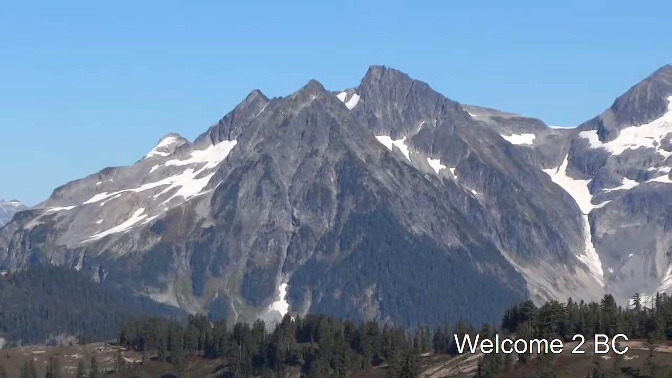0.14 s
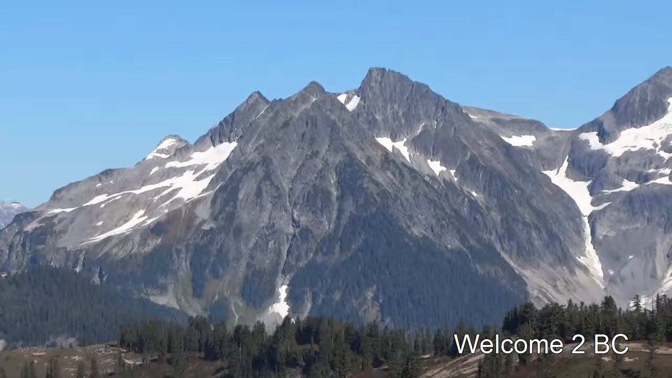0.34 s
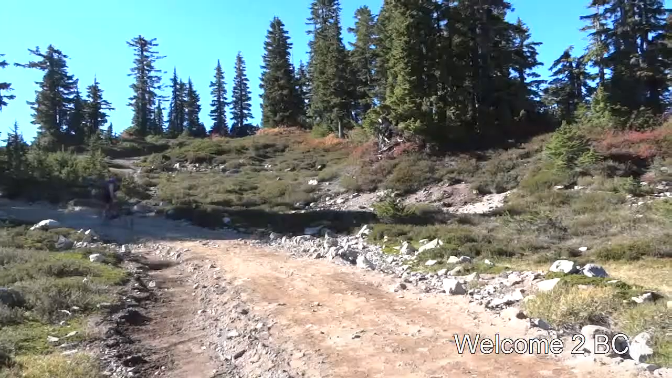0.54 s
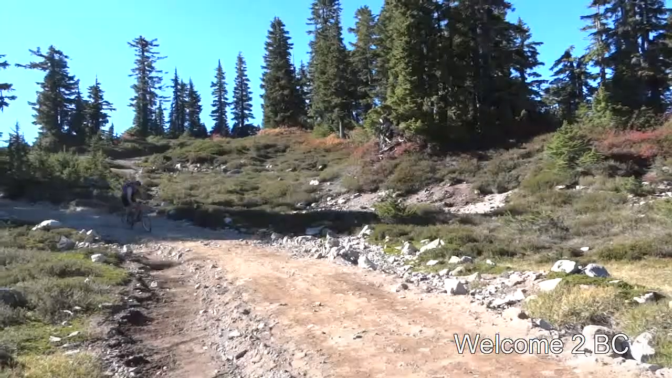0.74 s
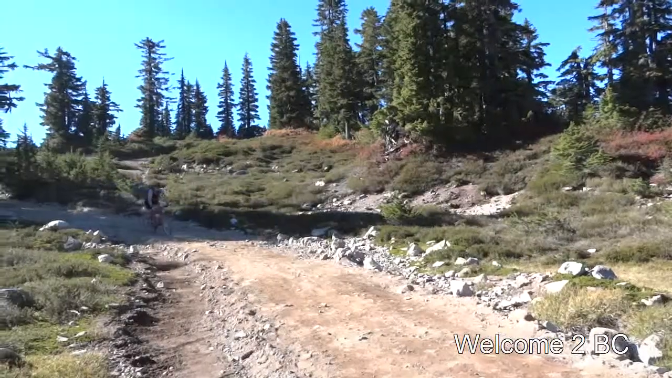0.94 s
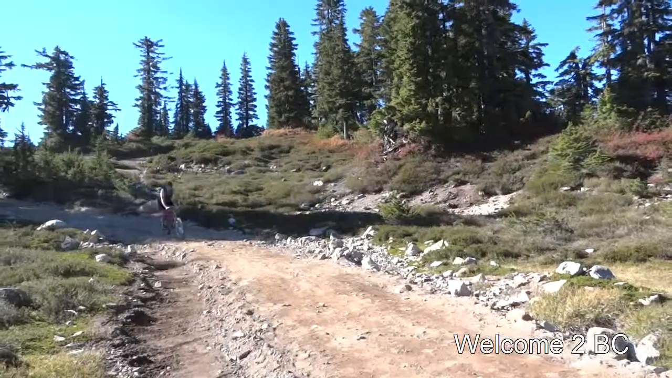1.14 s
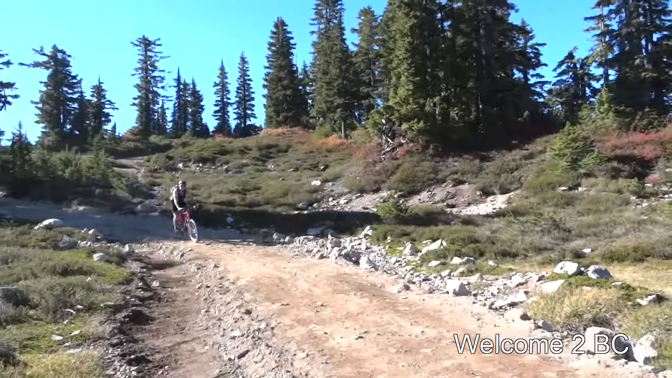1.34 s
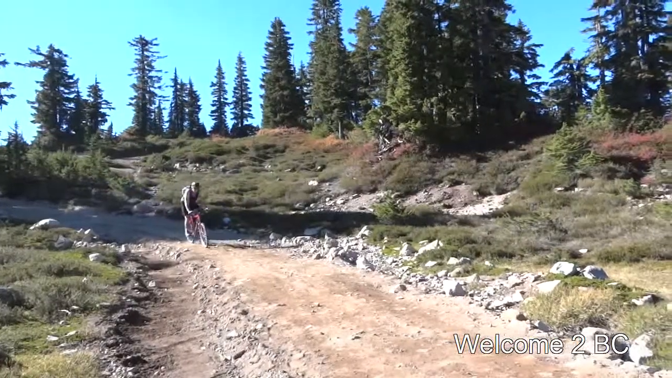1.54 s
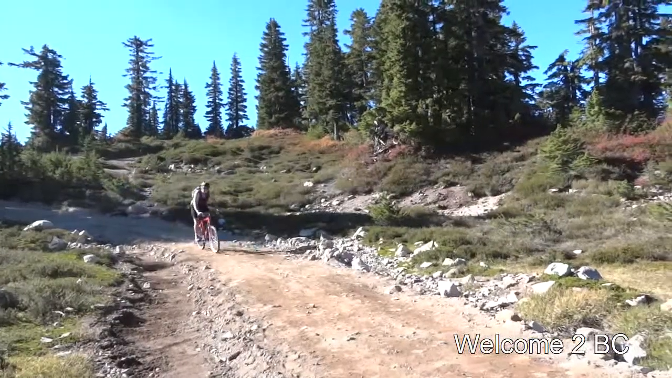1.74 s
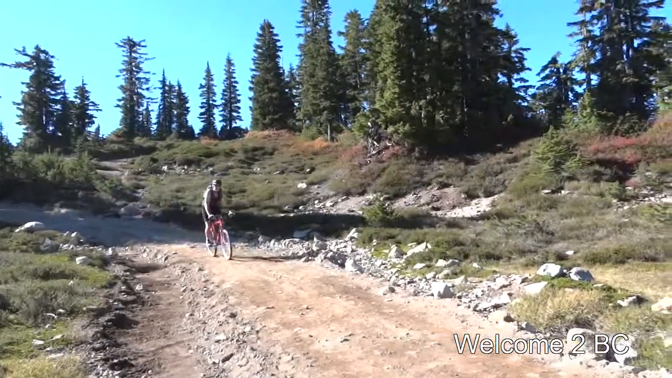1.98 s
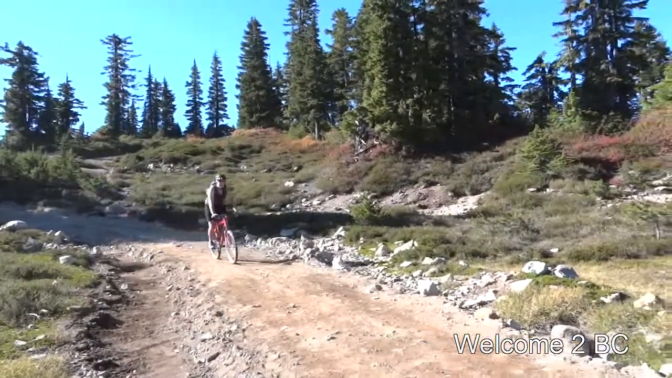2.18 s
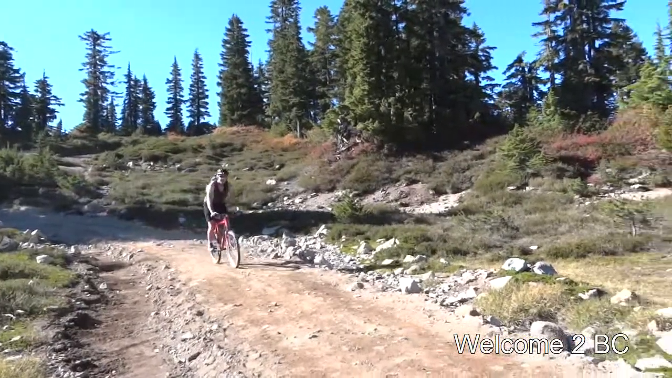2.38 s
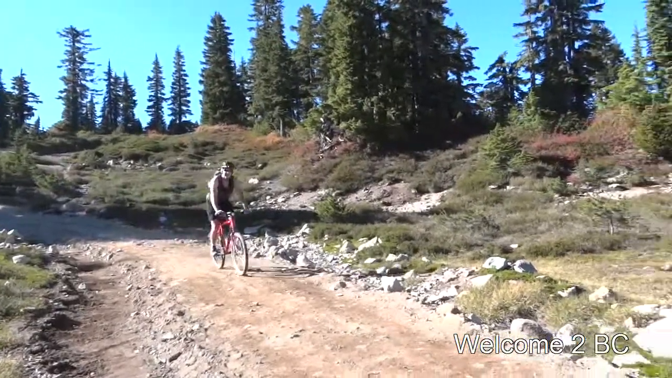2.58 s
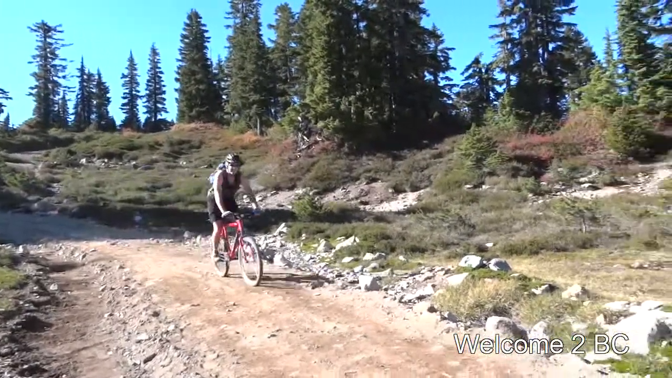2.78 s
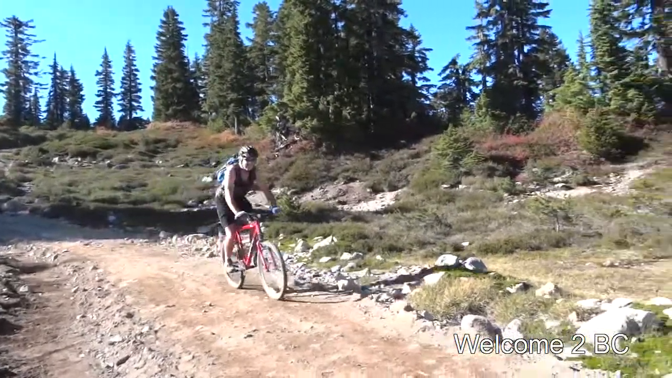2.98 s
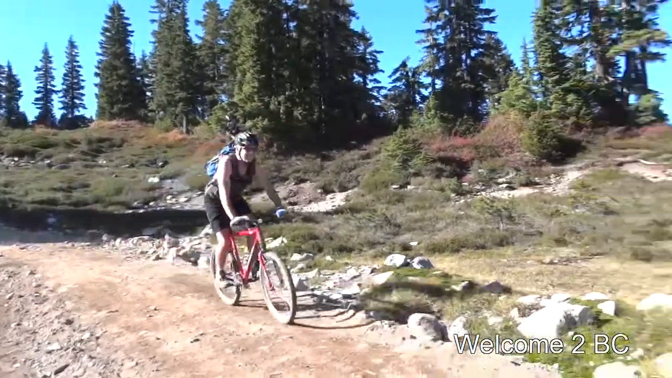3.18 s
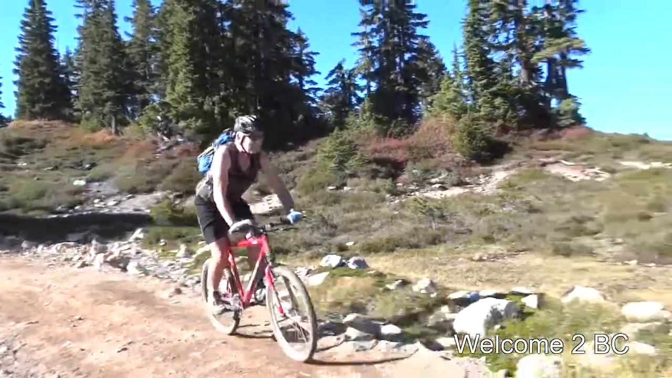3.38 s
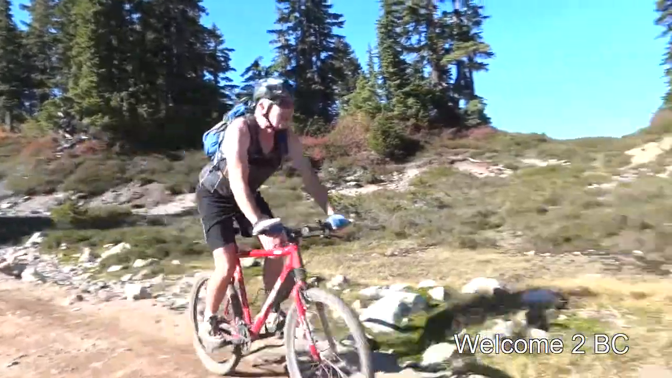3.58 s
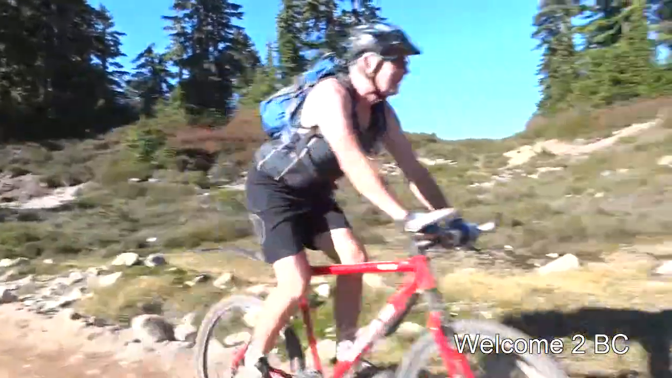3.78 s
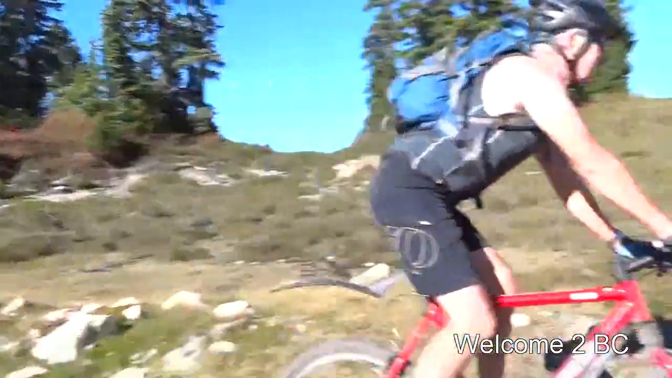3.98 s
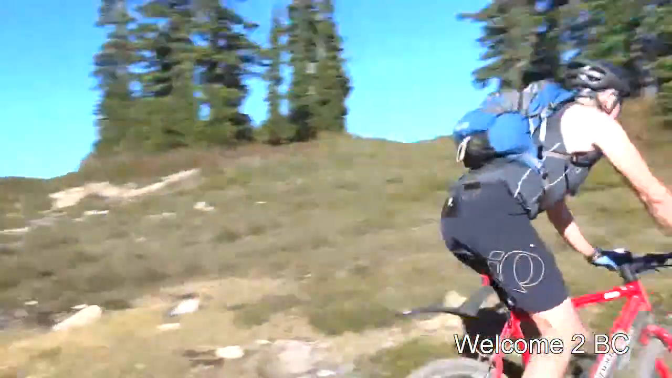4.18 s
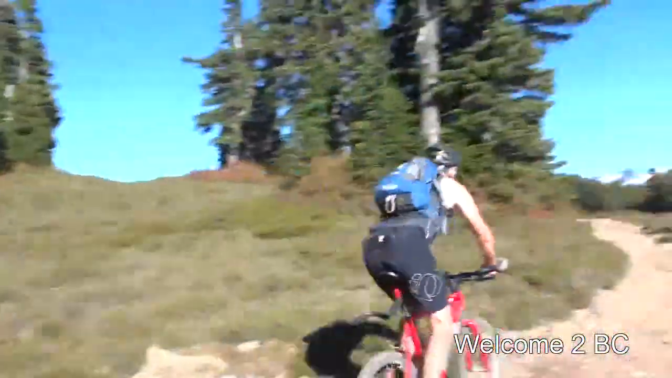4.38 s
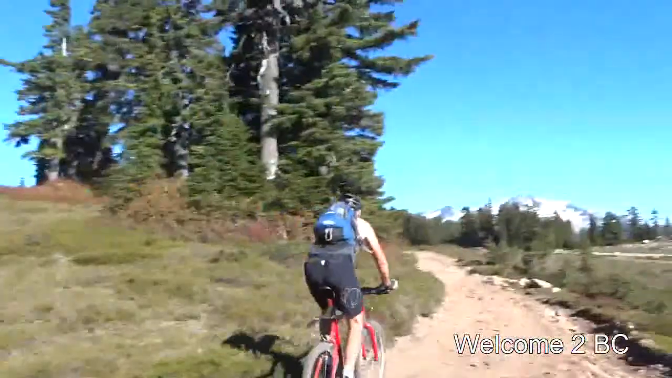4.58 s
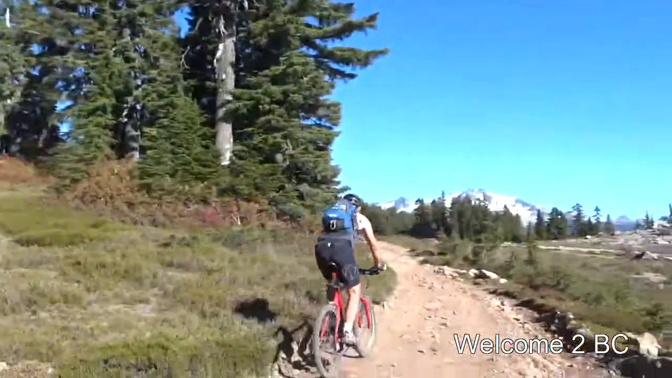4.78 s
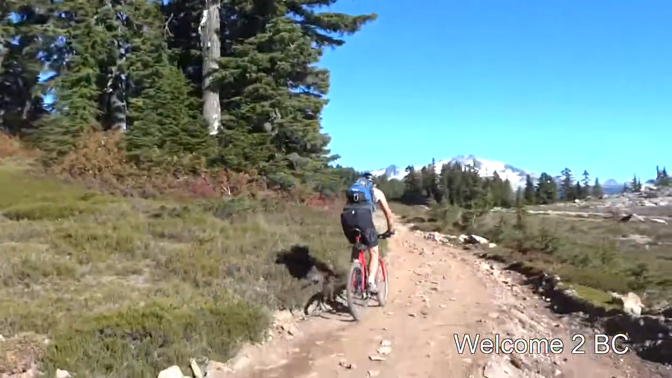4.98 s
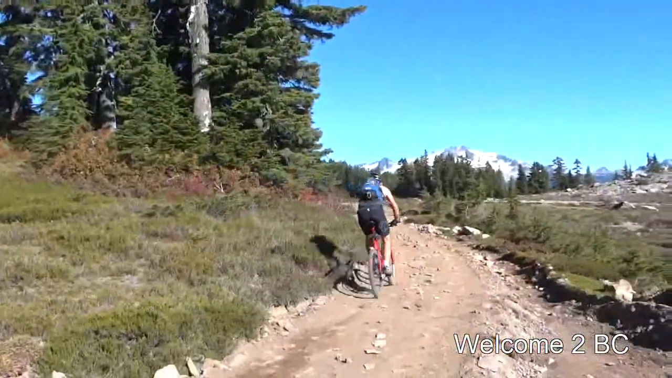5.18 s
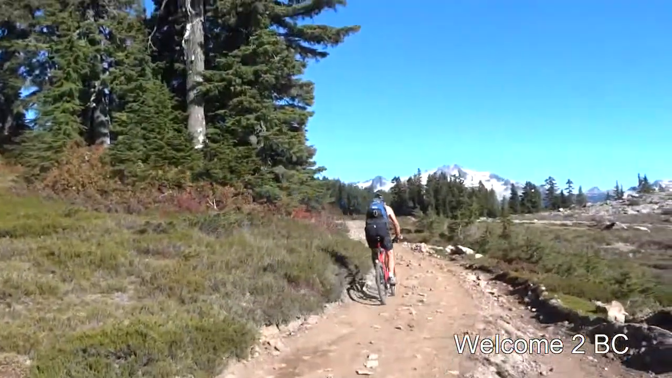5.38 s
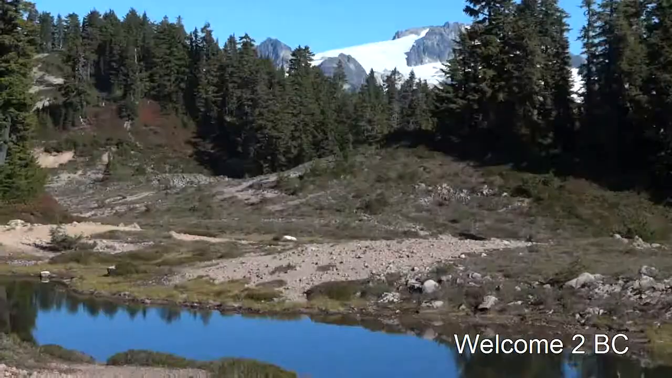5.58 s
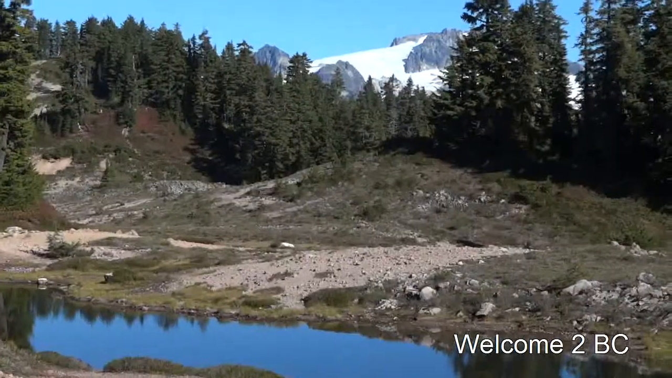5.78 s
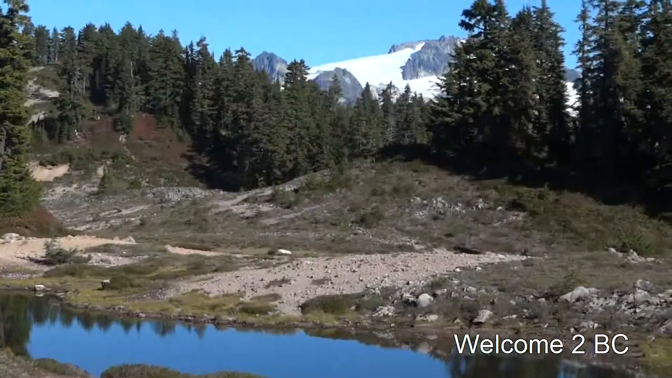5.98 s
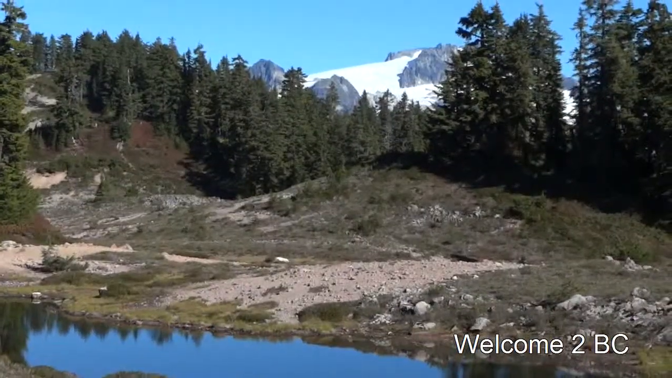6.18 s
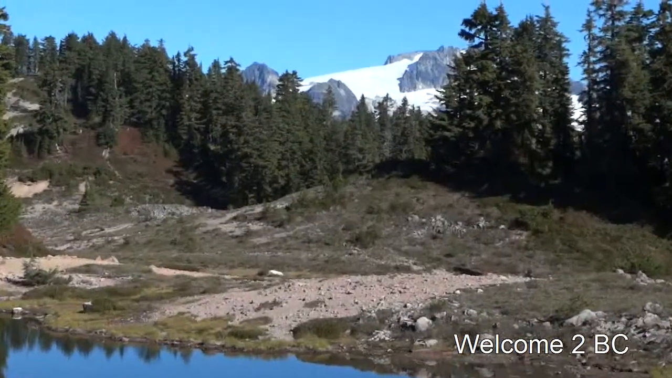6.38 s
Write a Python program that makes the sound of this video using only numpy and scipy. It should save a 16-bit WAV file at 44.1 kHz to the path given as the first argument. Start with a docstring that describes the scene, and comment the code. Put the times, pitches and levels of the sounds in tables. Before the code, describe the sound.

In quiet mountain air, a short high hiss gives way to a mountain bike approaching on a stony trail. Its tyres drum and crunch on gravel, stones knock, and the chain and frame rattle. It passes close to the hand-held microphone, freewheel ticking, then fades away. Light wind rumbles underneath, and a few dry clicks from the camera body come at the end.

```python
"""Mountain bike passing on a stony trail

Quiet alpine air, a hand-held camera at the trailside. A short high hiss, then a bike rolls up, passes
close to the microphones at about 4 s and rides away. Tyres drum and crunch on gravel, stones knock,
chain and frame rattle, the freewheel ticks; a close echo combs the colour. Wind rumbles on the
microphones, and the camera body clicks at the end."""
import sys
import numpy as np
from scipy import signal
from scipy.fft import rfft, irfft
from scipy.io import wavfile
from scipy.ndimage import uniform_filter1d, map_coordinates

SR = 44100
rng = np.random.default_rng(int(sys.argv[2]) if len(sys.argv) > 2 else 0)


def persist_wave(psi):
    """Save psi, clipped to +-1, as 16-bit WAV."""
    counts = np.round(np.clip(psi, -1, 1) * 32767).astype(np.int16)
    wavfile.write(sys.argv[1], SR, np.atleast_2d(counts).T)


N = 283553
T = np.arange(N) / SR
SIDES = np.array([[1], [-1]])  # pan is always left minus right

# the rolling bike as heard from the trailside: t/s, drum/dB, crunch/dB, rattle/dB, grit/dB, pan/dB
ROLL = [(0.44, -53, -62, -72, -76, 2), (0.64, -57, -62.5, -55.5, -65, 2), (0.86, -60, -77, -60.5, -73, 0.5),
        (0.89, -52, -58.5, -57.5, -69.5, 3), (0.97, -56, -69.5, -66, -70.5, 2),
        (1.71, -46.5, -65, -56.5, -68.5, 2), (2.06, -54, -69, -65, -69.5, 0.5),
        (2.42, -47.5, -52, -55.5, -66.5, 1), (2.79, -53, -54.5, -57.5, -69.5, 0),
        (3.05, -44, -55.5, -60, -73, -0.5), (3.45, -43.5, -47.5, -51, -64, 0),
        (3.55, -37, -44.5, -49, -63.5, -0.5), (3.61, -40.5, -41.5, -48, -53.5, 0),
        (3.74, -36.5, -43.5, -46, -56.5, -0.5), (4.28, -37, -54.5, -47, -52, -5.5),
        (4.65, -40.5, -56, -55, -59, -2), (5.06, -50, -58, -56.5, -61, -1.5),
        (5.25, -45, -64, -56, -68, -3), (5.48, -57.5, -66.5, -63.5, -77, -3),
        (5.64, -51.5, -58, -54.5, -67, -2.0)]
# a tyre lands on a rock: t/s, level/dB, f/Hz, low thud/dB
LANDINGS = [(0.892, -34, 150, -46.5), (3.042, -38, 288, -54), (3.531, -20.5, 276, -71),
            (4.12, -52, 288, -58), (4.239, -35, 284, -44.5), (4.622, -44, 288, -51),
            (4.676, -30, 181, -43.5)]


def tyres():
    """Knobs drum the tyre; stones crack under it and shake the frame. Returns drum and gravel."""
    # resonances of tyre air, casing, stones, frame and grit: f/Hz, width/Hz, level/dB
    cavity_modes = [(207.3, 101, -6), (292.4, 11.8, 10), (305.5, 116, -2)]
    casing_modes = [(380, 68, 20), (553, 132, 27)]
    stone_modes = [(717, 257, 3), (1070, 346, -1)]
    frame_modes = [(1395, 326, 1.5), (2370, 730, -2), (3230, 560, -19)]
    grit_modes = [(3840, 900, 24.5), (5780, 250, 21), (7040, 1230, 17), (10000, 1200, 19)]
    # patches of loose gravel: middle t/s, half length/s, swell/dB
    loose = [(0.547, 0.027, 11.5), (0.632, 0.013, 11), (0.937, 0.057, 6), (1.172, 0.015, 4),
             (1.245, 0.028, 10), (1.495, 0.035, 6), (1.736, 0.049, 2.5), (2.18, 0.057, 11.5),
             (2.348, 0.053, 7.5), (2.55, 0.045, 1.5), (2.973, 0.023, 7), (3.13, 0.027, 5),
             (3.368, 0.041, 8), (3.718, 0.018, 3.5), (3.888, 0.022, 8), (4.327, 0.064, 6.5),
             (4.493, .03, 6.5), (4.989, 0.021, 8.5), (5.045, 0.022, 12), (5.175, 0.043, 8.5),
             (5.285, 0.023, 3), (5.56, 0.015, 5.5)]
    s, drum_db, crunch_db, frame_db, grit_db, pan_db = np.transpose(ROLL)
    casing_db = -43.5 + 4.9 * (drum_db + 37)  # follows the drum steeply: heard only close by
    swell = undb(sum(db * np.exp(-((T - at) / half) ** 2) for at, half, db in loose))
    patch, bumps = walk(24.98), undb(2.5 * walk(9))
    knobs = grains(2000, 5.2, 2.3) * undb(0.99 * patch) * bumps
    cracks = grains(600, 4.2, 2.0) * undb(1.2 * patch) * bumps
    shakes = grains(900, 3.4, 2.1) * undb(5.1 * patch) * bumps
    fine = grains(1100, 5.0, .8) * undb(2.5 * patch) * bumps
    drum = unit(ring(knobs, cavity_modes)) * gain(s, drum_db)
    casing = unit(ring(ring(knobs, casing_modes), [(440, 280, 0)])) * gain(s, casing_db)
    crunch = unit(ring(cracks, stone_modes)) * gain(s, crunch_db)
    frame = unit(ring(unit(shakes) + 0.17 * unit(cracks), frame_modes)) * gain(s, frame_db)
    grit = ring(unit(fine) + 1.1 * unit(shakes), grit_modes)
    grit = unit(band(grit, 2000, 22000)) * gain(s, grit_db)
    pan = np.interp(T, s, pan_db) * SIDES / 2
    return drum + casing, swell * ((crunch + frame) * undb(pan) + grit * undb(0.86 * pan))


def thumps():
    """A tyre landing on a rock gives one soft low cycle and a short after-swing."""
    out = np.zeros(N)
    for s, db, hz, _ in LANDINGS:
        cycles = np.clip(T - s, 0, None) * hz
        out -= undb(db) * np.sin(2 * np.pi * cycles) * cycles ** 2 * np.exp(1.5 - cycles / 0.56)
    return out


def stone_strikes():
    """Each blow is a puff of noise that rings chain and frame; its treble dies first."""
    # loudest blows: t/s, level/dB, relative knock/dB, relative rattle/dB, decay/ms, pan/dB
    hits = [(0.464, -32, -2, -19, 1, -8), (0.49, -36, 0, -8.5, 1.9, -9), (0.512, -29.5, -12, -7, 3, 1.0),
            (0.538, -29, -6.5, -6, 5.8, 1.0), (0.614, -36, -14, -11, 4.8, 0.5),
            (0.866, -43, -17, -9, 3, 0.0), (0.884, -37, -13, -5, 3, 1.0), (1.181, -41, -19, -1, 3, 0.0),
            (1.237, -29.5, -7, -8.5, 2.1, -10.5), (1.437, -41, -0.5, -19, 3, -0.5),
            (1.471, -35.5, -14, -7, 3, 0.0), (1.719, -36.5, -16, -1, 4.7, 0.0),
            (2.164, -36, -20, -4, 3.3, 0.0), (2.185, -31.5, -16, -7, 1.8, -3), (2.229, -30, -20, -10, 2, 5),
            (2.319, -33, -9, -17, 3, 0.0), (2.367, -37, -12, -7, 2.2, -3),
            (2.397, -34, 1.5, -16, 3.9, -0.5), (2.52, -31.5, -15, -3.5, 3.9, -0.5),
            (2.652, -44, -5, -20, 3, -2.0), (2.699, -42.5, 0.5, -10, 3.8, -1.0),
            (2.782, -36.5, -2, -15, 3, 0.0), (3.001, -33, -7, -24, 4.1, -3.5),
            (3.018, -29.5, 3.5, -8.5, 5.7, -5.5), (3.144, -34, -7, -0.5, 1.8, 1),
            (3.181, -20, -2.5, -16, 1.9, -6.5), (3.224, -38, -1, -6, 3, 3), (3.273, -37, -1, -7, 3.3, 2),
            (3.313, -34, -3, -11, 3, -0.5), (3.359, -28, -4, -1, 8.9, -0.5), (3.442, -32, -5, -11, 3, 1),
            (3.475, -27, -10, -13, 3, -1.0), (3.51, -30, -7, -11, 2.4, 2),
            (3.529, -22.5, -7, -7, 2.4, -1.0), (3.573, -17.5, -13, -11, 6.5, -1.0),
            (3.643, -29, -13, -7.5, 3.7, -4), (3.669, -34, -7, -16, 2.4, 1),
            (3.7, -25, -11, -2.5, 5.9, -1.0), (3.756, -22, -9, -13, 3, -1),
            (3.817, -27.5, -15, -4.5, 4, -6), (3.842, -23.5, -4.5, -7, 3.3, -1.0),
            (3.863, -14.5, -9.5, -6, 9, -3.5), (3.947, -21.5, -10, -8.5, 3.9, -3.0),
            (3.967, -17.5, -9, -3.5, 6.1, -4), (4.011, -31, -3, -5, 3.3, -4), (4.048, -22, -5, -9, 3, -1),
            (4.072, -20.5, -1, -10.5, 1.6, -11), (4.1, -20.5, -3, -8, 2.3, 1),
            (4.142, -23, -2, -21, 2.6, -2), (4.219, -13, -4, -12, 1.8, -10),
            (4.255, -17, -8, -5, 2.7, -4.0), (4.285, -22.5, -5, -3.5, 3, -3.0),
            (4.319, -16.5, -9, -16, 4.2, -2), (4.341, -27, -15, -14, 3.6, -3.0),
            (4.396, -21, -9.5, -7.5, 2.2, -5), (4.445, -18, -11.5, -13.5, 9, -3),
            (4.473, -20, -7, -4.5, 1.8, -5.5), (4.55, -25.5, -7.5, -13, 3, -1.5),
            (4.606, -27, -6.5, -5.5, 4.9, -3), (4.669, -32, -13, -4, 3, 0.5),
            (4.807, -42, -18, -9, 3, -2.0), (4.845, -39, -7, -16, 2.5, 2), (4.925, -18, -4, -8, 2.3, -6),
            (4.961, -29, -4.5, -6, 5.7, -1.0), (5.036, -27, -7, -10, 3, -2.0),
            (5.044, -23, -8, -9, 4.3, -2.0), (5.151, -35, -5, -11, 3, -2.0),
            (5.194, -30, -15, -21, 2.4, -6), (5.284, -35, -6, -27, 3, -2.5), (5.317, -35, -2, -19, 3.6, -5),
            (5.35, -32.5, -8, -3, 3, -2.5), (5.462, -37, -2, -21, 2.5, -2.0)]
    # modes of chain and frame: f/Hz, level/dB, t60/s
    metal_modes = [(2199, 6.5, 0.043), (2470, 12.5, 0.01), (3370, -45, 0.027), (4000, -2.5, 0.15),
                   (5000, 10, 0.035), (7570, 6, 0.027), (8710, -14, .02), (9950, -17, .02)]
    out, t = np.zeros((2, N + 2560)), np.arange(2560) / SR
    hz, db, t60 = np.transpose(metal_modes)[:, :, None]
    s, level_db, knock_db, rattle_db, ms, pan_db = np.transpose([*hits, *pebbles()])[:, :, None]
    noise = rng.standard_normal((len(s), len(t)))
    fade = np.exp(-t * 1000 / np.maximum(ms, .3)) * (1 - np.exp(-t / 0.00023))
    fade = fade + 0.14 * fade ** 0.15  # gravel settles more slowly
    chance = rng.standard_normal((len(s), 2, len(hz), 1))
    decays = undb(db - 42 + 4 * chance[:, 0]) * np.exp(-np.log(1000) * t / t60)
    tones = (decays * np.sin(2 * np.pi * hz * (1 + 0.019 * chance[:, 1]) * t)).sum(axis=1)
    rung = signal.fftconvolve((noise * fade)[:, :1024], tones, axes=1)[:, :len(t)]
    knock = unit_peak(band(noise * fade + rung, 586, 1436))
    rattle = unit_peak(band(noise * fade ** 1.03 + rung, 1880, 3330))
    tick = unit_peak(band(noise * fade ** 6.8 + rung, 2400, 8600))
    body = undb(level_db) * (undb(knock_db) * knock + undb(rattle_db) * rattle)
    for k, at in enumerate(s[:, 0]):
        # the microphones separate left and right best in the middle range
        place(out, at, body[k], 0, pan_db[k])
        place(out, at, tick[k], level_db[k] - 23.5, 0.18 * pan_db[k])
    return out[:, :N]


def pebbles(per_s=24):
    """Rows of smaller stone strikes at random moments, their level following the rolling."""
    s, _, crunch_db, frame_db, _, pan_db = np.transpose(ROLL)
    draws = rng.random((int(per_s * (s[-1] - s[0])), 6)).T
    at = s[0] + draws[0] * (s[-1] - s[0])
    size, knock, rattle, length, side = 2 * draws[1:] - 1
    db = np.interp(at, s, np.maximum(crunch_db, frame_db)) + 12.5 + 8.5 * size
    ms = 4.1 * np.exp(.5 * length)
    pan = np.interp(at, s, pan_db) + 6 * side
    return np.transpose([at, db, -6 + 5 * knock, -10 + 5 * rattle, ms, pan])


def ticks(decay_ms=2.2):
    """Chain links and flying grit: tiny bright puffs, each with a pitch of its own."""
    # loudest ticks: t/s, level/dB, f/Hz, pan/dB
    loudest = [(0.4324, -46, 8010, -2), (0.4556, -45, 8100, 6), (0.5116, -48, 8000, 7),
               (0.6953, -40, 7750, 3), (0.7405, -41, 7460, 2.5), (0.797, -38, 7600, 3.0),
               (0.9067, -44, 7260, 1.5), (1.045, -49, 6740, 1.5), (1.2175, -48, 5100, 3),
               (1.2305, -38.5, 7370, 0.5), (1.472, -40.5, 7280, 1.0), (1.5423, -44.5, 8410, 1.5),
               (1.689, -43, 7520, 1.0), (2.1639, -33.5, 7400, 1.0), (2.4692, -43, 7740, 1.0),
               (2.7481, -44.5, 7620, 1.0), (2.9661, -44, 7540, 0.5), (3.069, -36.5, 7460, 0.5),
               (3.17, -41.5, 7100, 5), (3.3158, -52, 6380, 1.0), (3.375, -39, 5740, 1.0),
               (3.3993, -39, 7260, 1.0), (3.5308, -53, 6650, 0.5), (3.5457, -37, 7850, 0.0),
               (3.5726, -36.5, 8240, 0.5), (3.7079, -45, 5240, 0.0), (3.863, -24.5, 5100, -1.5),
               (3.9468, -50, 5150, -10), (3.9686, -30, 4900, -1.5), (4.0406, -39, 6270, -2.0),
               (4.0616, -37.5, 9900, -1.0), (4.089, -31, 6600, -2.0), (4.144, -35, 5270, -2.5),
               (4.2198, -28, 5200, -1.0), (4.246, -37, 8960, -9), (4.308, -47, 5000, -3.0),
               (4.328, -31, 4880, -3.5), (4.3579, -40, 4810, -3.0), (4.3804, -33, 8400, -7),
               (4.4143, -46, 9260, -3.5), (4.4743, -31.5, 4970, -4), (4.567, -36, 7100, -2.0),
               (4.9266, -39, 5500, -2.0), (5.0319, -46, 8730, -0.5)]
    out, t = np.zeros((2, N + 1024)), np.arange(1024) / SR
    rows = [*loudest, *specks()]
    puffs = band(rng.standard_normal((len(rows), len(t))) * np.exp(-t * 1000 / decay_ms), 3400, 10200)
    for puff, (s, db, hz, pan_db) in zip(puffs, rows):
        place(out, s, unit_peak(puff + ring(puff, [(hz, 500, 11)])), db, pan_db)
    return out[:, :N]


def specks(per_s=14):
    """Rows of fainter ticks at random moments and pitches, their level following the grit."""
    s, *_, grit_db, pan_db = np.transpose(ROLL)
    when, size, pitch, side = rng.random((int(per_s * (s[-1] - s[0])), 4)).T
    at = s[0] + when * (s[-1] - s[0])
    db = np.interp(at, s, grit_db) + 14.5 + 5.5 * (2 * size - 1)
    return np.transpose([at, db, 5200 + 4200 * pitch, np.interp(at, s, pan_db) + 8 * (side - .3)])


def freewheel():
    """Pawls drop over the ratchet teeth at the wheel's pace and ring the hub."""
    # coasting past the microphones: t/s, clicks per second, level/dB
    coasting = [(3.3, 54, -86), (3.8, 41.5, -72), (4.2, 59, -63), (4.451, 52.4, -58.5), (4.7, 46.6, -69),
                (5.001, 50, -84), (5.2, 51, -75), (5.35, 49, -68), (5.5, 36, -85), (5.64, 49, -85)]
    # hub resonances: f/Hz, width/Hz, level/dB
    hub_modes = [(8100, 390, -19), (9050, 100, 11), (10800, 200, -19.5)]
    s, rate_hz, db = np.transpose(coasting)
    teeth = np.floor(np.cumsum(np.interp(T, s, rate_hz)) / SR + 0.26).astype(int)
    drops = np.diff(teeth, prepend=teeth[0]) * undb(3.6 * rng.standard_normal(N // 400))[teeth]
    return unit(ring(noise_tails(drops, tail_ms=1.6), hub_modes)) * gain(s, db)


def hiss(start_s=.424, attack_s=.01, hold_s=0.18, fade_db_per_s=107):
    """A grainy high hiss that starts at once, holds and fades."""
    t = np.clip(T - start_s, 0, None)
    shape = np.minimum(t / attack_s, 1) * undb(-53 - fade_db_per_s * np.clip(t - hold_s, 0, None))
    return unit(ring(ring(grains(2500, 1.8, 2.2), [(7700, 1500, 0)]), [(7700, 2200, 0)])) * shape


def close_echo(x):
    """A hard surface by the microphones returns the sound about a millisecond late and combs it."""
    # the lag moves as the camera turns: t/s, lag/ms, strength/0-1
    echo = [(.42, .855, .7), (1.3, .842, .7), (1.9, .842, .75), (2.2, .858, .75), (2.45, .895, .75),
            (2.85, .935, .75), (3.4, .925, .65), (3.9, .975, .55), (4.2, .98, .35), (4.45, 1.03, .45),
            (4.7, 1.135, .7), (5.05, 1.135, .7), (5.25, 1.085, .65), (5.65, .93, .55)]
    s, lag_ms, strength = np.transpose(echo)
    back = np.arange(N) - np.interp(T, s, lag_ms) * SR / 1000
    # the surface is small, so the middle range comes back weaker than the treble
    bright = x - .45 * signal.filtfilt(*signal.butter(2, 3200, fs=SR), x)
    delayed = np.array([map_coordinates(channel, [back], order=3) for channel in bright])
    return x + np.interp(T, s, strength) * delayed


def distance_dips(x):
    """Narrow dips mark the far sound and fill in as the bike draws level with the microphones."""
    # dips in the spectrum: f/Hz, width/Hz
    dips = [(575, 105), (1150, 204), (1810, 110), (2950, 83), (3820, 190)]
    # their depth along the ride: t/s, depth/0-1
    dip_depth = [(.42, 0.6), (1.5, 0.75), (2.5, 1), (3.0, 0.52), (3.5, 0.5), (4.0, 0.02), (4.5, 0),
                 (5.65, 0.15)]
    depth = np.interp(T, *np.transpose(dip_depth))
    for hz, width in 2 * dips:  # twice, for steep sides
        x = x - depth * ring(x, [(hz, width, 0)])
    return x


def camera_clicks():
    """Right at the microphones: a dry crack, the shell answers 1.6 ms later, then a faint rustle."""
    # clicks of the camera body: t/s, level/dB, relative crack/dB, pan/dB
    clicks = [(5.77, -31, -4.5, -6), (5.826, -33, -2, -6), (5.933, -56, -17, -0.5),
              (6.046, -30.5, -2.5, -6.5)]
    # resonances of its shell: f/Hz, width/Hz, level/dB
    shell_modes = [(260, 240, -14.5), (762, 75, -1), (1370, 185, 2.5), (1780, 170, -4), (2110, 120, -6),
                   (3100, 140, -8.5)]
    out, t = np.zeros((2, N + 2048)), np.arange(2048) / SR
    for s, db, crack_db, pan_db in clicks:
        noise = rng.standard_normal((3, len(t)))
        crack = unit_peak(band(noise[0] * np.exp(-t / 0.00063), 1640, 4800))
        push = np.exp(-((t - .0016) / .00007) ** 2) + 0.099 * noise[1] * np.exp(-t / .002)
        shell = unit_peak(ring(push, shell_modes))
        rustle = unit_peak(band(noise[2] * np.exp(-t / 0.017), 450, 2300))
        place(out, s, undb(crack_db) * crack + shell + undb(-19) * rustle, db, pan_db)
    return out[:, :N]


def scatter(x):
    """Rocks and bushes scatter the sound, the middle range most, in opposite phase left and right."""
    t = np.arange(2048) / SR
    noise = rng.standard_normal(len(t)) * np.exp(-t / 0.008)
    tail = sum(band(noise, lo_hz, hi_hz) * undb(db)
               for lo_hz, hi_hz, db in [(1800, 12000, -34), (900, 1800, -25), (150, 450, -39)])
    return signal.fftconvolve(x.mean(axis=0), tail)[:N] * SIDES


def wind(thud_s=0.016):
    """Gusts press on both microphones almost alike; each landing adds a low thud."""
    # rumble under the gusts: t/s, level/dB
    breeze = [(.43, -65), (.7, -64), (1.3, -62.5), (2.0, -61), (2.47, -57), (2.86, -63), (3.2, -57),
              (3.8, -55), (4.3, -52), (4.8, -61), (5.15, -58), (5.65, -68)]
    mid, side = band(rng.standard_normal((2, N)), 45, 129)
    thuds = sum(undb(db) * np.exp(-((T - at) / thud_s) ** 2) for at, _, _, db in LANDINGS)
    gusts = gain(*np.transpose(breeze)) * undb(6.4 * walk(11))
    return unit(mid + .1 * side * SIDES) * (gusts + thuds)


def air():
    """Still mountain air and microphone hiss: a steady bed of shaped noise."""
    # noise spectrum: f/Hz, relative level/dB
    spectrum = [(15, -47), (25, -10), (202, -1.5), (468, -5.5), (573, -4.5), (798, -7), (1200, -11.5),
                (1360, -13.5), (1510, -11.5), (2510, -13.5), (11000, -25), (14300, -79), (22000, -120)]
    # how alike the two microphones hear it: f/Hz, likeness/0-1
    likeness = [(60, 0.9), (130, 0.9), (270, 0.8), (560, 0.01), (1180, 0.7), (2490, 0), (5250, 0.42),
                (11100, 0.8)]
    log_f = np.log(np.maximum(np.arange(N // 2 + 1) * SR / N, 1))
    colour_db, alike = (np.interp(log_f, np.log(hz), value)
                        for hz, value in map(np.transpose, (spectrum, likeness)))
    mid, side = rfft(rng.standard_normal((2, N)))
    both = mid * np.sqrt(1 + alike) + side * np.sqrt(1 - alike) * SIDES
    return unit(irfft(both * undb(colour_db), N)) * undb(-63.5)


def undb(db):
    return 10 ** (np.asarray(db) / 20)


def unit(x):
    return x / np.sqrt(np.mean(x ** 2))


def unit_peak(x):
    return x / np.abs(x).max(axis=-1, keepdims=True)


def band(x, lo_hz, hi_hz):
    return signal.sosfilt(signal.butter(2, [lo_hz, hi_hz], "bandpass", fs=SR, output="sos"), x)


def ring(x, modes):
    """Sum of resonances (f/Hz, width/Hz, level/dB) with alternating sign."""
    return sum((-1) ** k * undb(db) * signal.lfilter(*signal.iirpeak(hz, hz / width, SR), x)
               for k, (hz, width, db) in enumerate(modes))


def gain(s, db):
    """A dB curve as gain, silent outside its span."""
    return undb(np.interp(T, s, db)) * (T >= s[0]) * (T <= s[-1])


def walk(rate_hz):
    """Random levels held for 1 / rate_hz seconds and smoothed twice."""
    hold = int(SR / rate_hz)
    steps = np.repeat(rng.standard_normal(N // hold + 1), hold)
    return 0.69 * uniform_filter1d(uniform_filter1d(steps, hold), hold)[:N]


def noise_tails(impulses, tail_ms):
    """Each impulse becomes a decaying puff of noise."""
    return signal.lfilter([1], [1, -np.exp(-1000 / (tail_ms * SR))], impulses) * rng.standard_normal(N)


def grains(per_s, spread_db, tail_ms):
    """Random cracks of very unequal size."""
    sizes = (rng.random(N) < per_s / SR) * undb(spread_db * np.minimum(rng.exponential(size=N), 4))
    return noise_tails(sizes, tail_ms)


def place(out, at_s, sound, db, pan_db):
    """Add a mono sound to the stereo pair."""
    start = int(at_s * SR)
    out[:, start:start + len(sound)] += sound * undb(db + pan_db * SIDES / 2)


def scene():
    """The passing bike and the camera's clicks, scattered by the trailside, over wind and air."""
    drum, gravel = tyres()
    clatter = undb(-0.5) * (gravel + stone_strikes() + ticks() + freewheel())
    bike = distance_dips(drum + thumps() + close_echo(clatter))
    near = bike + camera_clicks()
    return near + scatter(near) + hiss() + wind() + air()


def record(dry, top_hz=11100):
    """The camera cuts the top steeply."""
    return signal.sosfilt(signal.ellip(10, .2, 60, top_hz, fs=SR, output="sos"), dry)


dry = scene()
out = record(dry)
persist_wave(out)
```